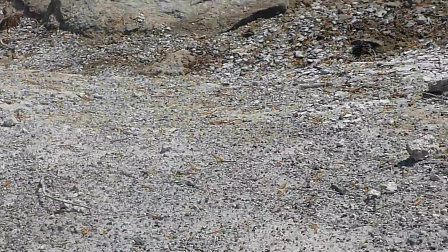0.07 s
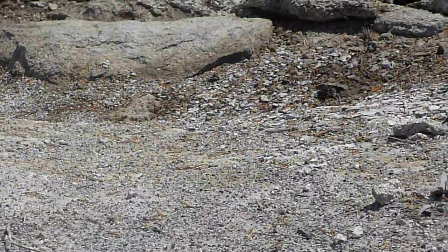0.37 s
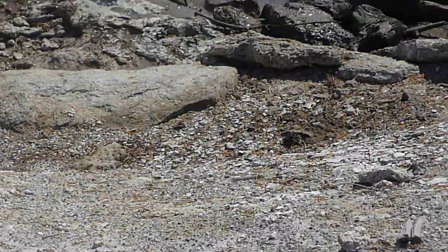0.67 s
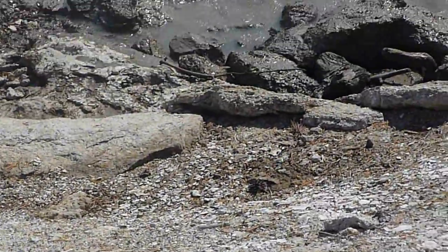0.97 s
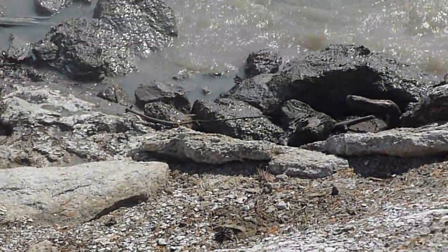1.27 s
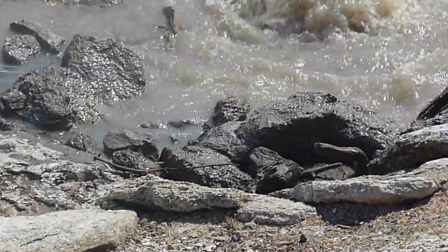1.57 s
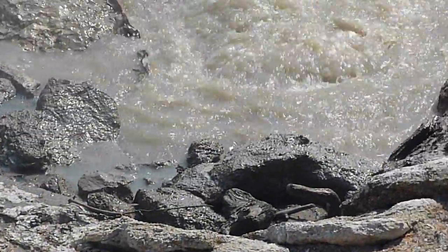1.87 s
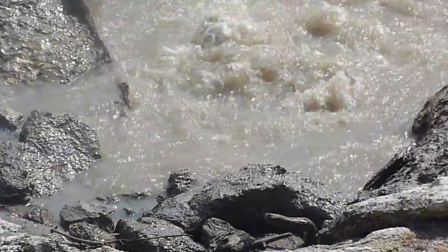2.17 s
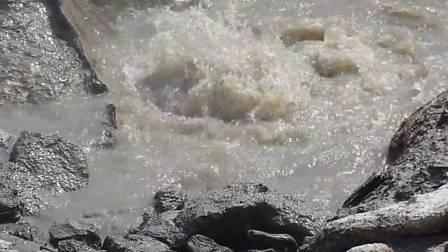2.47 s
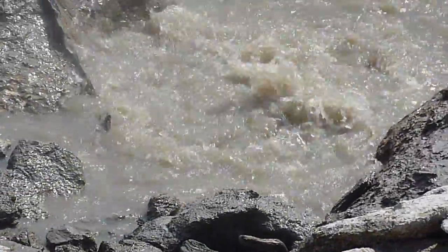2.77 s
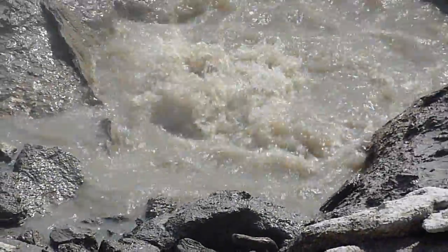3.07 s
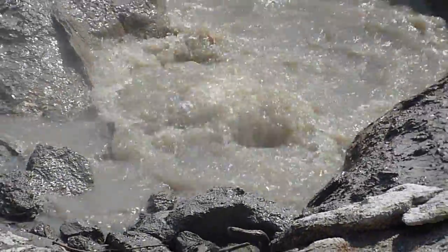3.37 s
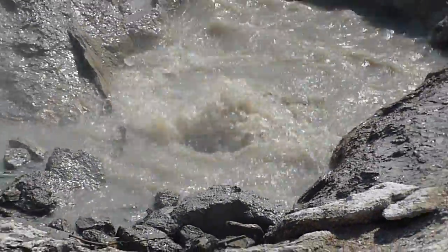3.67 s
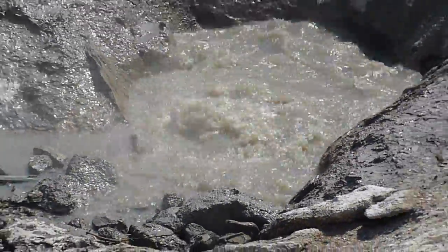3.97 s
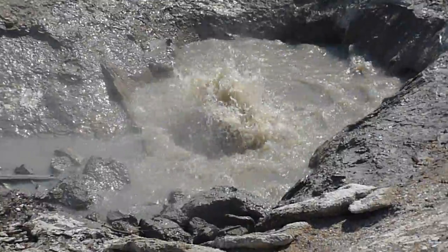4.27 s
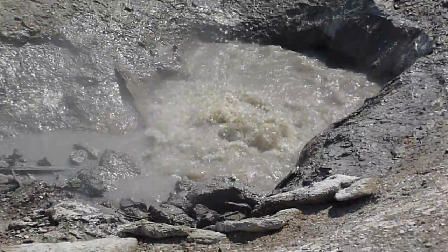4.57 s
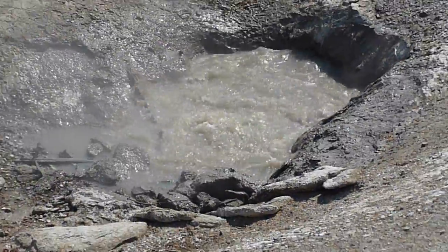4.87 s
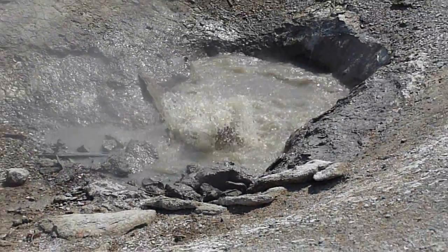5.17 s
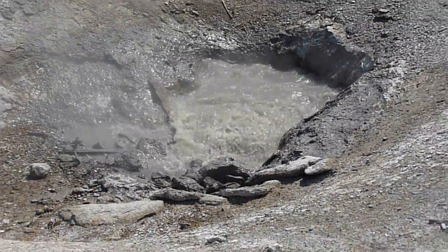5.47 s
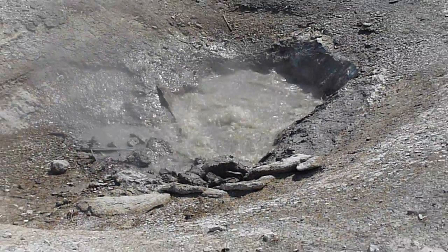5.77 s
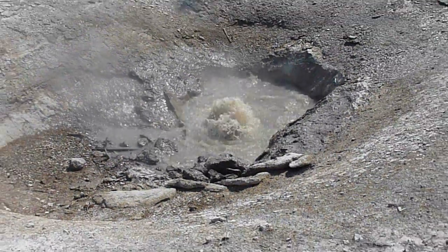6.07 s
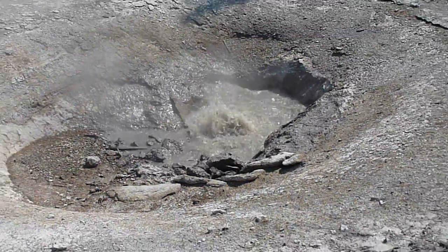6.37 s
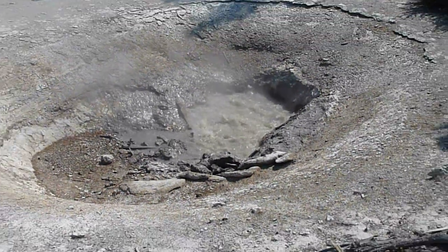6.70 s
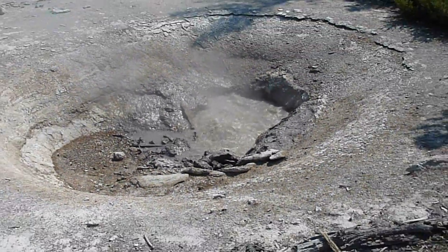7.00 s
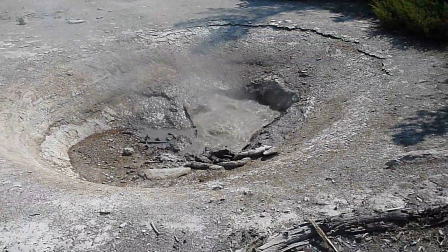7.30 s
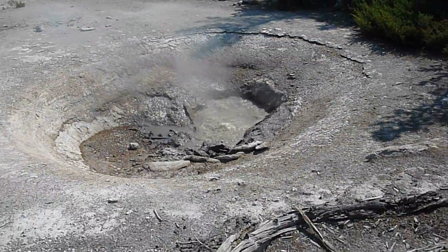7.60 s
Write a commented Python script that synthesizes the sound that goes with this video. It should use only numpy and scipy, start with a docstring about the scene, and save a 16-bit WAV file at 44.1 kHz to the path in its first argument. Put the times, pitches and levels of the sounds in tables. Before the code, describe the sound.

A muddy hot spring boils steadily outdoors, a dull churn with dense bubbling, soft glugs and a light hiss of steam.

```python
"""A muddy hot spring boils a few metres away in still air: a dull churn under a dense swarm of bubbles.
Steam heaves the pool in short surges. Gas pockets ring, the biggest as glugs; lifted mud slaps back
softly; steam hisses and spray ticks. A handheld camera's motor whines faintly, its filters notch
the motor bands, and the overall level steps down once with a soft bump."""
import sys
import numpy as np
from scipy import signal
from scipy.fft import rfft, irfft
from scipy.io import wavfile
from scipy.ndimage import uniform_filter1d

SR = 44100
rng = np.random.default_rng(int(sys.argv[2]) if len(sys.argv) > 2 else 0)


def dump(signal):
    """Clip the signal to [-1, 1] and save it as 16-bit WAV at the path in sys.argv[1]."""
    limited = np.clip(np.atleast_2d(signal).T, -1, 1)
    pcm = np.round(limited * 32767).astype(np.int16)
    wavfile.write(sys.argv[1], SR, pcm)


N = 345744
TIME_S = np.arange(N) / SR

# Slow level of the deep churning. Each row: time in seconds, level offset in dB.
DEEP_DRIFT = [(0, -2.8), (.75, -0.8), (1.15, -0.2), (1.7, -2.2), (2.25, 1.2), (2.55, -1.5), (2.9, -0.5),
              (3.5, 1.2), (3.85, 0), (4.4, -0.7), (4.8, 0), (5.3, -0.8), (5.9, 0), (7.84, 0)]
# Steam surges lifting the pool; lulls (negative) as it sinks.
# Each row: crest in seconds, rise at the surface in dB, 1/e half-width in seconds.
STEAM_SURGES = [(.89, 1.5, 0.042), (1.297, 0.4, .18), (1.605, 0, .024), (1.69, -2, 0.017),
                (2.424, 1.7, 0.044), (2.52, -2.2, .035), (3.62, -0.5, .04), (3.76, -2.4, 0.028),
                (3.847, 2, .04), (4.0, -0.5, .04), (4.754, 0.5, .05), (4.98, 1, 0.067), (5.27, -4.5, 0.034),
                (5.47, -2.5, .025), (6.31, 1, .04), (6.81, .9, .049), (7.32, 0.5, 0.078), (7.65, 0.5, .07)]
# Steam and fine fizz. Each row: frequency in Hz, density in dB per Hz.
STEAM_SPECTRUM = [(100, -112), (500, -94.5), (1000, -92.5), (2000, -93.5), (2800, -94), (4000, -96),
                  (5800, -97), (7400, -102.8), (8900, -103.5), (10300, -107)]
# Roar of churning mud. Each row: frequency in Hz, density in dB per Hz.
CHURN_SPECTRUM = [(20, -99), (40, -95), (70, -87.5), (100, -82.5), (175, -80), (320, -82.5), (500, -85),
                  (1000, -91), (2000, -99), (4000, -112)]
# Lifted mud falling back on the pool. Each row: peak time in seconds, peak level in dB.
MUD_SLAPS = [(1.47, -58), (5.432, -50.5), (5.54, -59)]
# Biggest steam bubbles. Each row: start in seconds, initial pitch in Hz, peak in dB, ring in cycles.
BIG_BUBBLES = [(0.873, 214, -52.5, 10), (1.019, 434, -52, 18), (1.195, 217, -51, 14), (1.252, 229, -51, 15),
               (1.584, 240, -50, 9), (1.6, 360, -47, 15), (1.799, 248, -47, 12), (1.889, 293, -50, 14),
               (2.43, 203, -49, 11), (3.052, 169, -51, 14), (3.56, 378, -54, 18), (3.604, 232, -51, 13),
               (3.983, 305, -51, 18), (4.758, 260, -54, 13), (4.8, 129, -51, 11), (4.924, 270, -50, 15),
               (6.308, 247, -50, 12), (6.33, 146, -54, 7.7), (6.978, 545, -51, 18), (7.298, 408, -51, 15)]
# Camera filters against motor noise. Each row: centre in Hz, width in Hz.
MOTOR_NOTCHES = [(2997, 1150), (4398, 1080), (8005, 1050)]


def undb(db):
    """Decibels to gain."""
    return 10 ** (np.asarray(db) / 20)


def level(x, rms_db):
    """Scale to an rms level."""
    return x * undb(rms_db) / np.sqrt(np.mean(x ** 2))


def wander(rate_hz):
    """Smooth random drift, unit spread."""
    span = max(int(SR / rate_hz), 2)
    drift = uniform_filter1d(rng.standard_normal(N), span, mode="wrap")
    drift = uniform_filter1d(drift, span, mode="wrap")
    return drift / drift.std()


def colour(white, spectrum):
    """Shape a white signal to (Hz, dB per Hz) points."""
    hz, db = np.transpose(spectrum)
    bins_hz = np.maximum(np.arange(N // 2 + 1) * SR / N, 1)
    gain = undb(np.interp(np.log(bins_hz), np.log(hz), db))
    return irfft(rfft(level(white, 0)) * gain, N) * np.sqrt(SR / 2)


def split(x, hz):
    """Parts below and above a frequency."""
    low = signal.sosfiltfilt(signal.butter(2, hz, fs=SR, output="sos"), x)
    return low, x - low


def add(out, start_s, sound):
    """Mix in a short sound."""
    i = max(int(start_s * SR), 0)
    part = sound[:max(N - i, 0)]
    out[i:i + len(part)] += part


def motor_whine(hz=2345, rms_db=-79.5, waver=0.00077):
    """Thin, slightly unsteady tone of the camera motor."""
    pitch_hz = hz * (1 + waver * wander(16))
    return level(np.sin(2 * np.pi * np.cumsum(pitch_hz) / SR), rms_db)


def boil(deep_share=0.41, simmer_db=0.3):
    """Deep heave and surface gurgle levels: steam surges swell and collapse over a simmer."""
    surge_db = sum(rise_db * np.exp(-((TIME_S - crest_s) / width_s) ** 2)
                   for crest_s, rise_db, width_s in STEAM_SURGES)
    drift_db = np.interp(TIME_S, *np.transpose(DEEP_DRIFT))
    return drift_db + deep_share * surge_db, simmer_db + surge_db


def steam(gurgle_db, spray_vs_hiss_db=-7, gurgle_share=0.072, drop_count=14000):
    """Smooth steam hiss, with fine ticks of spray landing in the pool."""
    drops = np.zeros(N)
    when, size = rng.random((drop_count, 2)).T
    drops[(when * N).astype(int)] = 2 * size - 1
    white = rng.standard_normal(N) + level(drops, spray_vs_hiss_db)
    return colour(white, STEAM_SPECTRUM) * undb(gurgle_share * gurgle_db)


def churn(heave_db, gurgle_db, tumble_db=0.1, splash_share=0.14):
    """Turbulent mud: lows follow the heave, mids the gurgle, highs the gurgle weakly."""
    roar = colour(rng.standard_normal(N), CHURN_SPECTRUM)
    deep, upper = split(roar, hz=220)
    surface, splash = split(upper, hz=740)
    bands = [(deep, heave_db), (surface, gurgle_db), (splash, splash_share * gurgle_db)]
    return sum(band * undb(db + tumble_db * wander(30)) for band, db in bands)


def slaps(band_hz=(240, 820), attack_s=0.009, decay_s=0.015):
    """Mud domes collapse: short, dull, unpitched splashes."""
    bandpass = signal.butter(2, band_hz, "bandpass", fs=SR, output="sos")
    wash = level(signal.sosfilt(bandpass, rng.standard_normal(N)), 0)
    envelope = np.zeros(N)
    for peak_s, peak_db in MUD_SLAPS:
        age_s = TIME_S - peak_s
        envelope += undb(peak_db) * np.exp(np.minimum(age_s / attack_s, -age_s / decay_s))
    return wash * envelope


def bubble(hz, ring_cycles, glide, swell_cycles):
    """A gas pocket swells, rings down and rises in pitch as it nears the surface."""
    age_cycles = np.arange(int(ring_cycles * SR / hz) + 2) * hz / SR
    swell = 1 - np.exp(-(age_cycles / swell_cycles) ** 2)
    envelope = swell * np.exp(-np.log(100) * age_cycles / ring_cycles)
    phase_cycles = age_cycles * (1 + glide * age_cycles / ring_cycles / 2)
    return envelope / envelope.max() * np.sin(2 * np.pi * phase_cycles)


def glugs():
    """Single big bubbles, just above the boil."""
    out = np.zeros(N)
    for start_s, hz, peak_db, ring_cycles in BIG_BUBBLES:
        add(out, start_s, undb(peak_db) * bubble(hz, ring_cycles, glide=0.11, swell_cycles=1.6))
    return out


def bubble_swarm(heave_db, gurgle_db, rms_db=-60.0, low_hz=145, high_hz=2200,
                 tilt_db_per_octave=0.1, scatter_db=1.5, mean_cycles=11, count=12000):
    """About 1500 overlapping bubbles a second, each quickly damped by mud."""
    out = np.zeros(N)
    for when, pitch, force, life in rng.random((count, 4)):
        octaves = pitch * np.log2(high_hz / low_hz)
        drive_db = heave_db if octaves < .5 else gurgle_db
        boil_db = drive_db[int(when * N)] / max(octaves, 1)  # small bubbles follow less
        gain_db = boil_db + tilt_db_per_octave * octaves + scatter_db * (2 * force - 1)
        ring = bubble(low_hz * 2 ** octaves, mean_cycles * (.5 + life), glide=0.23, swell_cycles=0.77)
        add(out, when * N / SR, ring * undb(gain_db))
    return level(out, rms_db)


def scene():
    """Pool and motor whine at one microphone."""
    heave_db, gurgle_db = boil()
    pool = churn(heave_db, gurgle_db) + bubble_swarm(heave_db, gurgle_db)
    pool += glugs() + slaps() + steam(gurgle_db)
    return (pool + motor_whine())[None]


def record(dry):
    """Motor notches, one step down, roll-off, very faint even hiss, steep cut of the highest treble."""
    step_s, ramp_s, early_gain_db = 2.0942, 0.0051, 1.97
    input_bias = -.044  # steps with the gain: the soft bump
    treble_hz, top_hz = 8080, 15700
    for centre_hz, width_hz in MOTOR_NOTCHES:
        dry = signal.lfilter(*signal.iirnotch(centre_hz, centre_hz / width_hz, SR), dry)
    before_step = np.clip(.5 + (step_s - TIME_S) / ramp_s, 0, 1)
    stepped = (dry + input_bias) * undb(early_gain_db * before_step)
    offset = stepped[:, :1]  # filters start settled on the bias
    dull = signal.sosfilt(signal.butter(12, treble_hz, fs=SR, output="sos"), stepped - offset)
    faint_hiss = level(rng.standard_normal(N), rms_db=-96.5)
    steep_cut = signal.ellip(8, .1, 70, top_hz, fs=SR, output="sos")
    return offset + signal.sosfilt(steep_cut, dull + faint_hiss)


dry = scene()
out = record(dry)
dump(out)
```